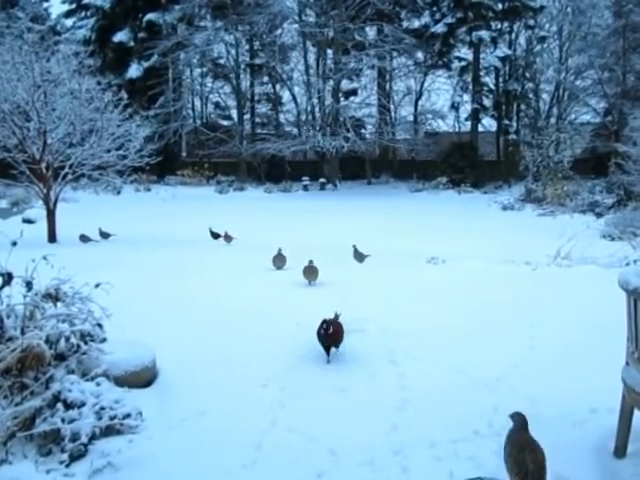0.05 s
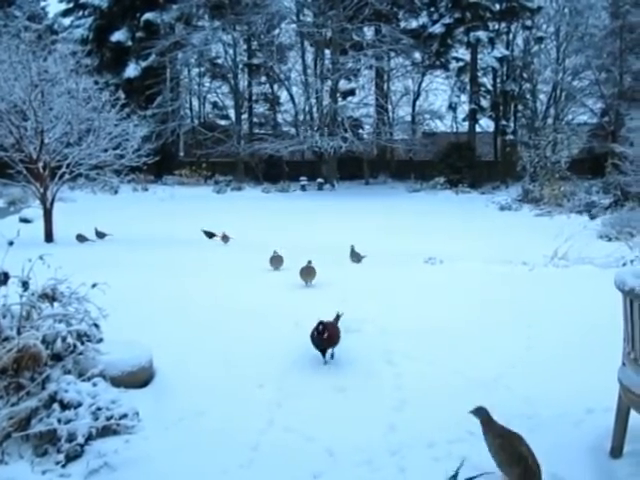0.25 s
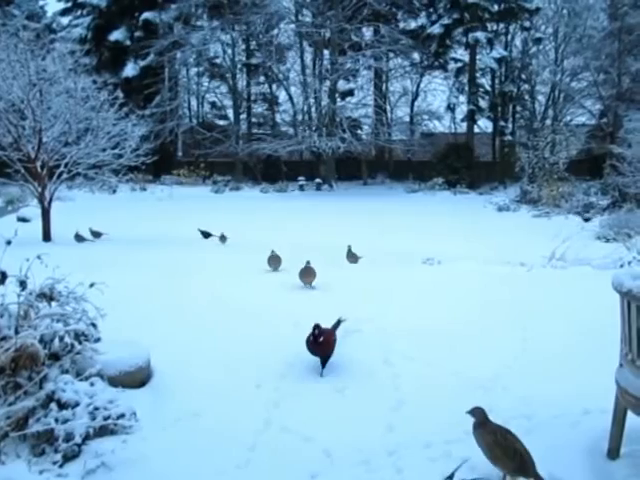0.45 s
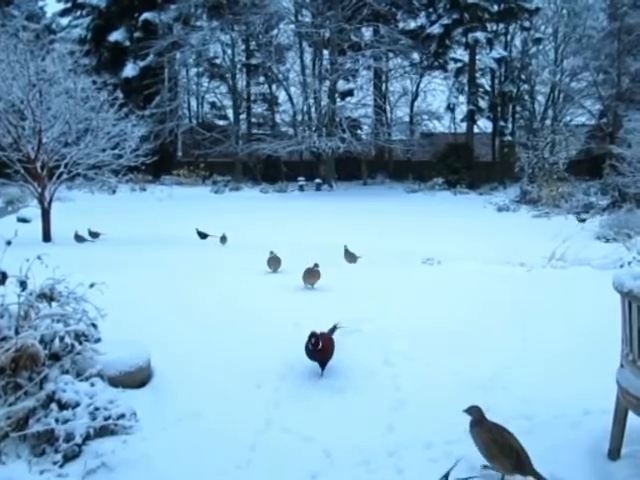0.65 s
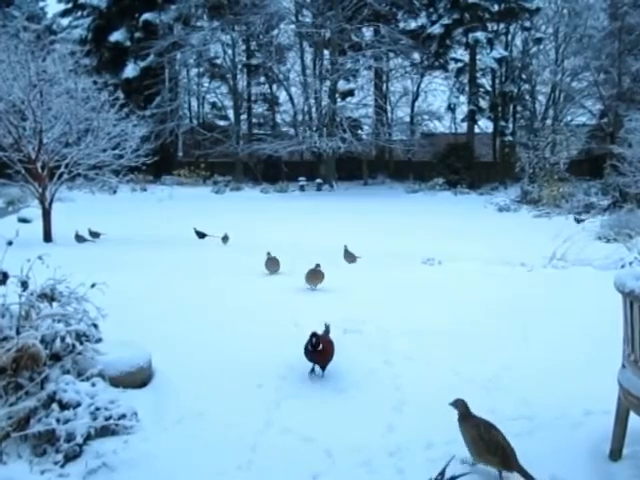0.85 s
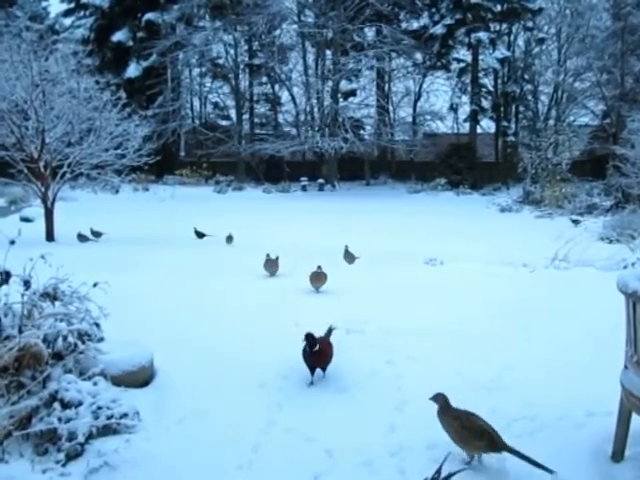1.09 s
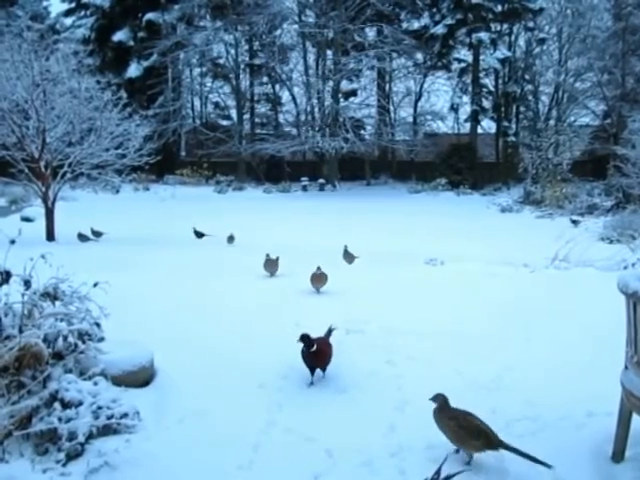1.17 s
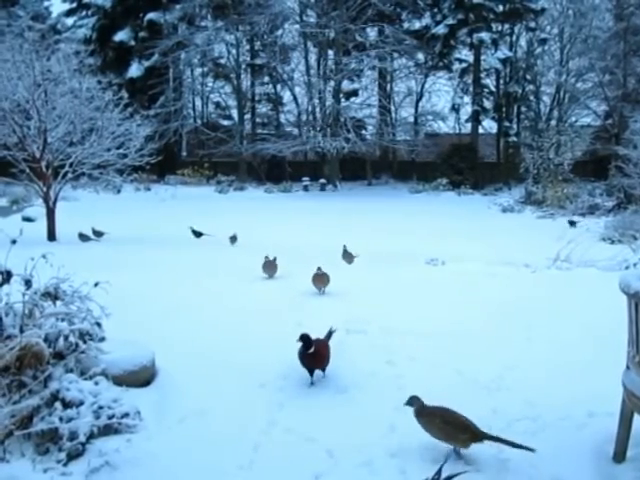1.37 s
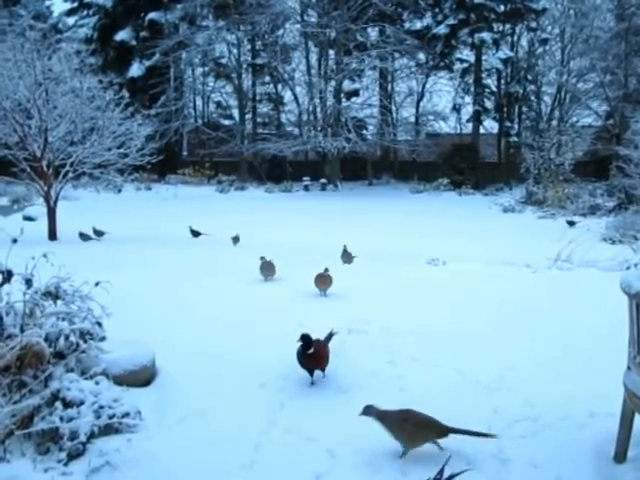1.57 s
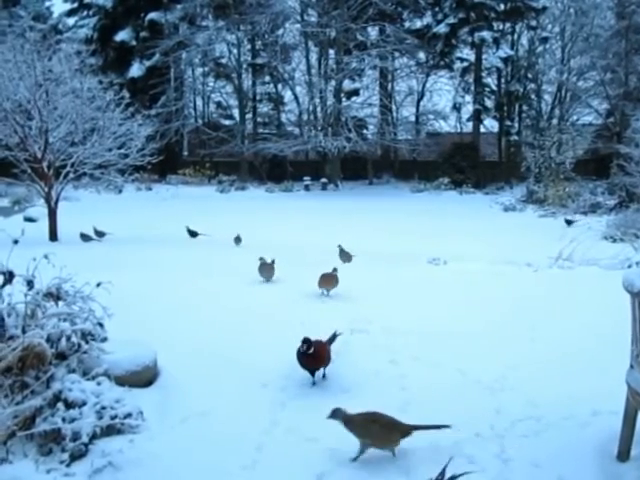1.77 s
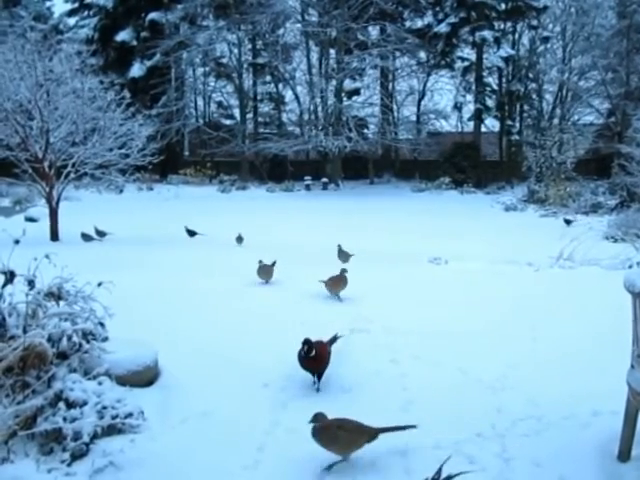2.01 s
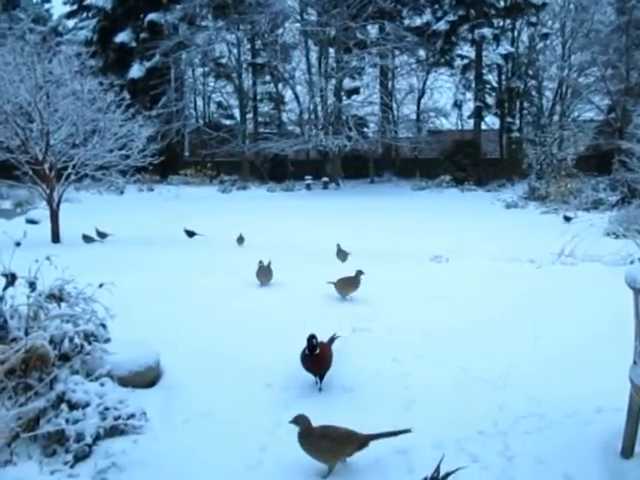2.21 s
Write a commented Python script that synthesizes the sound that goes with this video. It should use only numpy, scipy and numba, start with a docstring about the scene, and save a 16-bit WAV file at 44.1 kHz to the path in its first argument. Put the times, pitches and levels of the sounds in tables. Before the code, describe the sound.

In a quiet winter garden, a pheasant near the microphone gives a single quick, rising stutter of a call, with soft coos before and after. Light rustling and small ticks come and go over faint, low outdoor noise.

```python
"""Pheasant in a snowy garden.

A close pheasant gives one stuttering, rising call, its overtones shaped by the throat, with soft
closed-beak coos before and after. The house wall and trees answer faintly. Rustles, twig ticks,
a far bird's chips and a low hum lie over distant noise. Gain control ducks after the call and recovers."""
import sys
import numpy as np
from scipy import signal
from scipy.fft import rfft, irfft
from scipy.io import wavfile
from scipy.ndimage import uniform_filter1d
from numba import njit

SR = 44100
rng = np.random.default_rng(int(sys.argv[2]) if len(sys.argv) > 2 else 0)


def master_out(mix):
    """Clip the mix to full scale and print it as 16-bit PCM to the path in sys.argv[1]."""
    frames = np.transpose(np.atleast_2d(mix))
    ceiling = np.clip(frames, -1, 1)
    pcm = np.round(ceiling * 32767).astype(np.int16)
    wavfile.write(sys.argv[1], SR, pcm)


N = 99225
T = np.arange(N) / SR
BIN_HZ = np.arange(N // 2 + 1) * SR / N
SIDE_SIGN = np.array([[1], [-1]])


def undb(db):
    """Decibels to gain."""
    return 10 ** (np.asarray(db) / 20)


def curve(rows, col=1):
    """One table column, linearly interpolated in time."""
    rows = np.array(rows)
    return np.interp(T, rows[:, 0], rows[:, col])


def at_hz(points, hz):
    """A spectrum read on a log-frequency axis."""
    points = np.array(points)
    return np.interp(np.log(np.maximum(hz, 1)), np.log(points[:, 0]), points[:, 1])


def shaped(gain):
    """Unit-RMS noise shaped by gain(Hz)."""
    y = irfft(rfft(rng.standard_normal(N)) * gain(BIN_HZ + 1), N)
    return y / y.std()


def noise(points):
    """Noise with a spectrum of (Hz, dB) points."""
    return shaped(lambda f: undb(at_hz(points, f)))


def band(hz, width_hz):
    """Noise in one resonance."""
    return shaped(lambda f: 1 / (1 + ((f - hz * hz / f) / width_hz) ** 2))


def wander(rate_hz):
    """Smooth random drift, unit RMS."""
    return shaped(lambda f: 1 / (1 + (f / rate_hz) ** 4))


def wide(make, side=0.91, pan_db=1.5):
    """Two draws as mid and side; by default wide and slightly left."""
    stereo = (make() + side * make() * SIDE_SIGN) / np.hypot(1, side)
    return stereo * undb(SIDE_SIGN * pan_db / 2)


def ramp(u):
    """Smooth step from 0 to 1."""
    return np.sin(np.pi / 2 * np.clip(u, 0, 1)) ** 2


def swell(peak_s, width_s):
    """Rounded peak with exponential skirts."""
    return np.exp(1 - np.hypot((T - peak_s) / width_s, 1))


def late(x, delay_s):
    """Fractional delay."""
    return np.interp(T - delay_s, T, x, left=0)


# Each row: frequency in Hz, relative density in dB.
AIR_SPECTRUM = [(20, 10.5), (50, -4.5), (90, -3.5), (180, -5), (300, -4.5), (450, -1.5), (700, -8.5),
                (1100, -6.5), (1600, -5.5), (2000, -12.5), (2600, -23.5), (3500, -27.5), (6000, -51.5),
                (15000, -46.5)]
# Each row: frequency in Hz, side-to-mid ratio.
AIR_SIDE = [(30, .05), (125, .16), (500, .25), (1500, 0.63), (4000, .8)]
# Each row: time in seconds, level in dB.
AIR_LEVEL = [(0, -47.5), (.3, -47.5), (.6, -52.5), (.9, -47), (1.25, -53), (1.65, -52.5), (2.05, -56.5),
             (2.25, -56.5)]


def distant_noise():
    """Dull outdoor noise, wider in the treble."""
    side = irfft(rfft(noise(AIR_SPECTRUM)) * at_hz(AIR_SIDE, BIN_HZ), N)
    return (noise(AIR_SPECTRUM) + side * SIDE_SIGN) * undb(curve(AIR_LEVEL) + 0.28 * wander(14))


# Each row: frequency in Hz, relative level in dB.
HUM_TONES = [(53.8, 1.5), (123, -13), (174, -11.5)]
# Each row: time in seconds, level in dB.
HUM_LEVEL = [(0, -61.5), (.6, -73), (1.2, -59), (1.27, -50.5), (1.45, -58.5), (1.8, -57.5), (2.12, -53),
             (2.25, -51.5)]


def hum():
    """Three low tones wavering in pitch and level."""
    out = 0
    for hz, db in HUM_TONES:
        phase = 2 * np.pi * np.cumsum(hz * (1 + .025 * wander(7.1))) / SR
        out += undb(db + 2 * wander(24)) * np.sin(phase)
    return np.sqrt(2) * out * undb(curve(HUM_LEVEL))


# Each row: frequency in Hz, relative density in dB.
RUSTLE_SPECTRUM = [(300, 11.5), (1500, 7.5), (3500, 0.5), (5000, -1), (7000, -1.5), (9000, -3.5),
                   (10300, -1.5), (13000, -5.5), (16000, -18.5)]
# Each row: time in seconds, level in dB.
RUSTLE_LEVEL = [(0, -66), (.1, -56), (.2, -61), (.5, -69), (.75, -62), (.93, -60.5), (1.1, -64),
                (1.3, -60.5), (1.38, -57), (1.52, -60.5), (1.66, -62.5), (1.8, -54), (1.85, -60.5),
                (1.97, -53), (2.04, -53), (2.1, -57), (2.15, -55), (2.25, -57.5)]


def rustle():
    """Light noise, grainy from a fast level flicker."""
    flicker_db = 1.5 * wander(900) + 1.4 * wander(30.35)
    return wide(lambda: noise(RUSTLE_SPECTRUM)) * undb(curve(RUSTLE_LEVEL) + flicker_db + 0.5)


# Each row: peak time in seconds, level in dB.
CHIPS = [(0.018, -55.5), (0.061, -61), (.115, -56.5), (0.164, -58.5)]


def far_bird():
    """Faint high chips: brief swells of band noise."""
    env = sum(undb(db) * swell(peak_s, width_s=.012) for peak_s, db in CHIPS)
    return env * wide(lambda: band(hz=3170, width_hz=930))


# Each row: start in seconds, level in dB.
TICKS = [(0.039, -45.5), (0.6842, -50), (0.7657, -48.5), (1.1594, -48), (1.2305, -50.5), (1.435, -56),
         (1.809, -43.5), (1.878, -44.5)]
# Each row: frequency in Hz, relative density in dB.
TICK_SPECTRUM = [(500, -28), (2500, -1), (4300, 2), (8000, -4.5), (15000, -10.5)]


def ticks(decay_s=0.0015):
    """Twigs and icy snow: sudden bright bursts."""
    env = sum(undb(db) * (T >= at_s) * np.exp(-np.abs(T - at_s) / decay_s) for at_s, db in TICKS)
    return env * wide(lambda: noise(TICK_SPECTRUM))


# One table per coo. Each row: time in seconds, pitch in Hz, level in dB.
FIRST_COO = [(.10, 415.6, -63.5), (.125, 477.3, -42.5), (0.159, 511.3, -44), (0.206, 504, -42),
             (0.237, 519, -38.5)]
SECOND_COO = [(0.774, 380, -48), (0.818, 455, -45), (.87, 478.5, -45.5), (0.932, 488, -51.5),
              (0.981, 482.6, -46.5), (1.07, 434.2, -52.5), (1.121, 466, -45.5), (1.212, 449.9, -42.5),
              (1.272, 415.6, -45), (1.352, 366.3, -51), (1.40, 423.8, -51), (1.47, 456, -62.5)]
THIRD_COO = [(1.795, 380, -39), (1.815, 451, -41), (1.842, 503.5, -44.5), (1.859, 526, -50),
             (1.889, 550.7, -48.5), (1.96, 544.5, -52), (2.029, 543, -44), (2.091, 547.4, -54.5),
             (2.16, 499, -56)]


def coos(octave_db=-34.5, husk_db=-0.5):
    """Nearly pure closed-beak tones, each more unsteady and husky than the last."""
    out = 0
    for rows, roughness in ((FIRST_COO, .2), (SECOND_COO, .3), (THIRD_COO, .7)):
        hz = curve(rows) * (1 + .025 * roughness * wander(51))
        phase = 2 * np.pi * np.cumsum(hz) / SR
        gate = ramp((T - rows[0][0]) / 0.026) * ramp((rows[-1][0] - T) / 0.0075)
        flutter = 1 + roughness / 2 * wander(70)
        tone = np.sin(phase) + undb(octave_db) * np.sin(2 * phase)
        husk = roughness * undb(husk_db) * band(hz=449, width_hz=84)
        out += undb(curve(rows, col=2)) * gate * (flutter * tone + husk)
    return out * np.sqrt(2)


# Each row: peak time in seconds, width in seconds, level in dB, centre in Hz, bandwidth in Hz.
SCUFFS = [(0.22, 0.001, -40, 9920, 3550), (0.224, 0.0066, -50, 3490, 990), (0.335, 0.0015, -36, 1685, 1000),
          (0.375, 0.003, -46, 1700, 885), (0.715, .006, -49.5, 1850, 600), (.913, 0.0047, -42, 1990, 670),
          (1.175, .015, -59, 6900, 12000), (1.241, 0.005, -57.5, 6000, 12000),
          (1.525, 0.013, -59.5, 6440, 9000), (2.06, 0.004, -49, 6000, 14100),
          (2.133, 0.0067, -45.5, 5790, 14110), (2.131, 0.006, -44, 1410, 2040),
          (2.234, 0.013, -50, 910, 81)]


def scuffs():
    """Short swells of mid and treble noise."""
    return sum(undb(db) * swell(peak_s, width_s) * wide(lambda: band(hz, width_hz))
               for peak_s, width_s, db, hz, width_hz in SCUFFS)


# Each row: start, length and attack in seconds, pitch in Hz, glide in Hz/s, level before the throat
# in dB, relative level of harmonic 2 and of harmonics 3-5 in dB, fade in dB/s.
NOTES = [(0.2346, 0.02, 0.012, 462, -1800, -9, -7, -12.5, 1097),
         (0.2582, 0.033, 0.012, 541.9, -1700, -1.5, 4, -2.5, 195.5),
         (.2995, 0.021, 0.0045, 607.7, -2900, 0.5, 1, 0.5, 594),
         (0.3136, 0.024, 0.0064, 597, -2000, -4, -11, 3, 988.5),
         (0.3372, 0.024, 0.0095, 686.5, -1400, 2, -1, -3.5, 293.5),
         (0.377, .024, 0.01, 724, 1904, -4, 2, 2, 542.5),
         (0.3976, 0.034, 0.0022, 726, 593, -13.5, -3.5, 0.5, 390.5),
         (0.419, 0.045, 0.0078, 822, 1482.5, -10, 8, -3, 417.5),
         (.448, 0.11, .008, 875, -500, -31, -4.5, -12, 231.5)]
# Each row: frequency in Hz, gain in dB.
THROAT = [(400, 1.5), (700, -0.5), (1030, -11), (1200, -8.5), (1360, -6.5), (1540, -17), (1770, -22.5),
          (2050, -28.5), (2200, -22.5), (2420, -43), (2750, -44.5), (3200, -69), (5000, -69.5)]
# Each row: frequency in Hz, relative density in dB.
RASP_SPECTRUM = [(60, -9), (200, -5), (500, 0), (1500, -3), (2300, -11), (3000, -24), (5000, -26),
                 (7500, -22), (11500, -25), (14000, -42)]


def call(release_s=0.0076, opening=0.3, rasp_db=-33):
    """Climbing notes over rushing air; overtones open with the effort and pass the throat."""
    voice, effort = np.zeros(N), np.zeros(N)
    jitter, shimmer = 1 + .01 * wander(280), 1 + .08 * wander(210)
    for start_s, length_s, attack_s, pitch_hz, glide_hz_s, db, octave_db, upper_db, fade_db_s in NOTES:
        age_s = np.clip(T - start_s, 0, length_s)
        env = ramp(age_s / attack_s) * ramp((length_s - age_s) / release_s)
        env *= undb(-fade_db_s * np.maximum(age_s - attack_s, 0))
        on = env > 0
        hz = (pitch_hz + glide_hz_s * age_s) * jitter
        phase = 2 * np.pi * np.cumsum(hz * (age_s > 0)) / SR
        for k, colour_db in enumerate([0, octave_db, upper_db, upper_db, upper_db], 1):
            gain = undb(db + colour_db + at_hz(THROAT, k * hz[on]))
            harmonic = -np.cos(k * phase[on] - np.pi / 4 * (k - 1))
            voice[on] += gain * env[on] ** (1 + opening * (k - 1)) * harmonic
        effort += env * undb(db)
    airflow = uniform_filter1d(effort, size=1100)
    rasp = undb(rasp_db) * airflow * wide(lambda: noise(RASP_SPECTRUM), side=0.57, pan_db=0)
    return voice * shimmer + rasp


# Each row: peak time in seconds, level in dB.
PUFFS = [(.287, -31.5), (.305, -39.5), (.322, -29.5), (.345, -39), (.404, -31.5)]


def puffs(width_s=0.0024):
    """Low puffs of air with the notes."""
    env = sum(undb(db) * np.exp(-((T - peak_s) / width_s) ** 2) for peak_s, db in PUFFS)
    return env * band(hz=257.5, width_hz=750)


PORT_LAG_S = .00006  # the left microphone port hears the bird later
WALL_S, WALL_DB = 0.008, -13.5
FAR_TREES_S, FAR_TREES_DB = .42, -52.5
TAIL_T60_S, TAIL_DB = .33, -28.5


def garden(bird):
    """Direct sound, wall and far-tree echoes, and a thin, dull tail ringing at one pitch."""
    direct = np.array([late(bird[0], PORT_LAG_S), bird[1]])
    wall = np.array([late(direct[0], WALL_S + 0.00065), late(direct[1], WALL_S)])
    trees = np.array([late(channel, FAR_TREES_S) for channel in direct])
    impulse = wide(lambda: band(1100, 1500) + undb(-7) * band(hz=834, width_hz=31), side=0.7, pan_db=0)
    impulse *= undb(-60 * T / TAIL_T60_S) * ramp(T / 0.023)
    impulse /= np.sqrt(np.sum(impulse ** 2))
    tail = signal.fftconvolve(direct, impulse, axes=1)[:, :N]
    return direct + undb(WALL_DB) * wall + undb(FAR_TREES_DB) * trees + undb(TAIL_DB) * tail


# Each row: peak time in seconds, width in seconds, level in dB, centre in Hz, bandwidth in Hz.
BUMPS = [(1.265, 0.058, -55.5, 122.4, 250), (1.915, 0.0043, -43, 187, 250), (2.03, 0.02, -45, 356, 350),
         (2.09, 0.064, -48.5, 154, 205)]


def bumps():
    """Soft swells of low noise, centred."""
    return sum(undb(db) * swell(peak_s, width_s) * band(hz, width_hz)
               for peak_s, width_s, db, hz, width_hz in BUMPS)


def scene():
    """The pheasant and its echoes over the dry background."""
    background = distant_noise() + hum() + rustle() + far_bird() + ticks() + scuffs() + bumps()
    return background + garden(coos() + call() + puffs())


@njit
def follow(x, attack_s, release_s):
    """One-pole level follower."""
    out, level = np.empty(len(x)), 0.
    for i in range(len(x)):
        level += (x[i] - level) / (SR * (attack_s if x[i] > level else release_s))
        out[i] = level
    return out


DUCK_KNEE_DB, LOWPASS_HZ = -15.5, 15850


def record(dry):
    """Gain control ducks everything after loud sounds; a steep low-pass cuts the top."""
    level = follow(np.abs(dry).mean(axis=0), attack_s=0.028, release_s=0.16)
    ducked = dry / np.sqrt(1 + level / undb(DUCK_KNEE_DB))
    return signal.sosfilt(signal.ellip(10, .2, 80, LOWPASS_HZ, fs=SR, output="sos"), ducked)


dry = scene()
out = record(dry)
master_out(out)
```